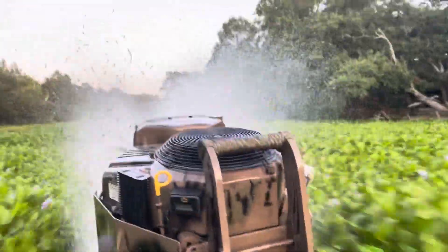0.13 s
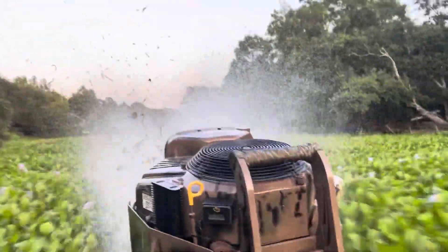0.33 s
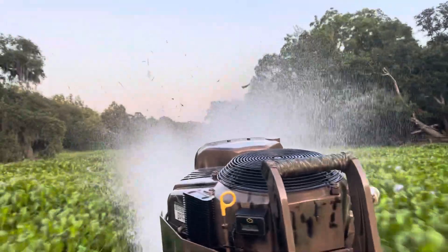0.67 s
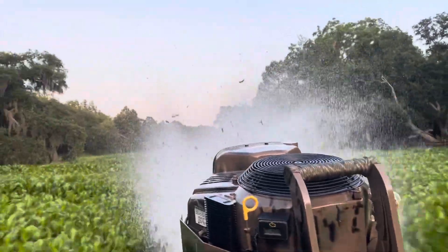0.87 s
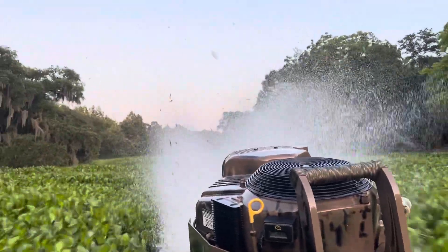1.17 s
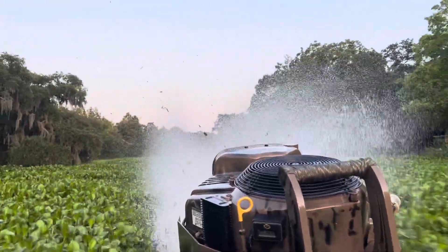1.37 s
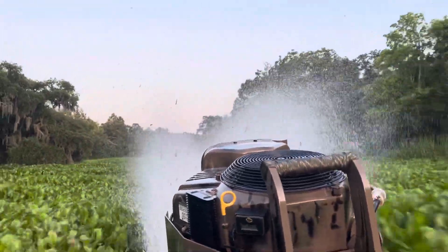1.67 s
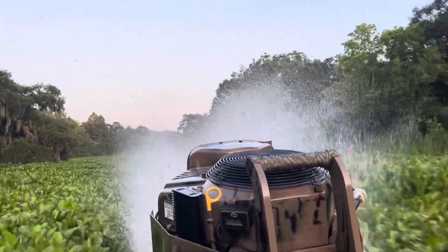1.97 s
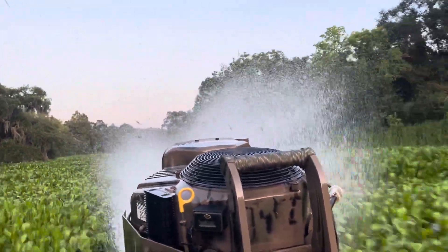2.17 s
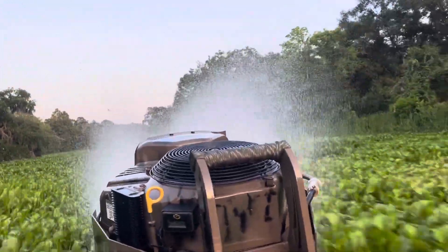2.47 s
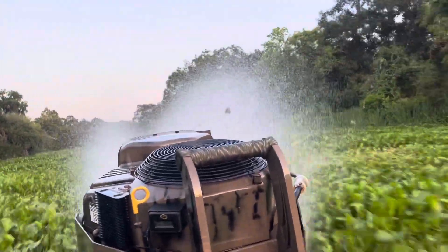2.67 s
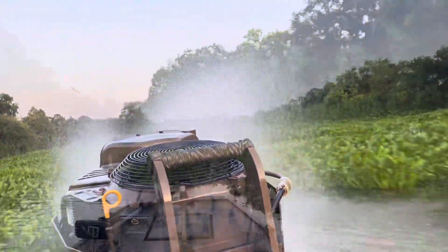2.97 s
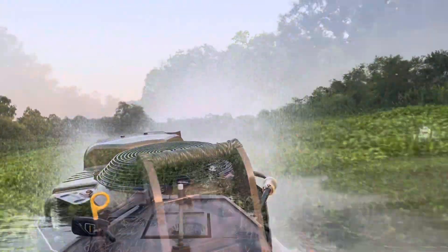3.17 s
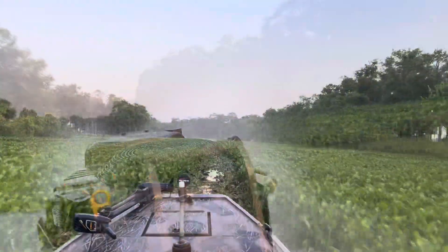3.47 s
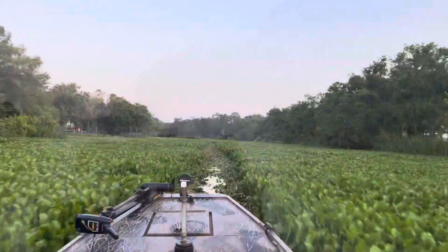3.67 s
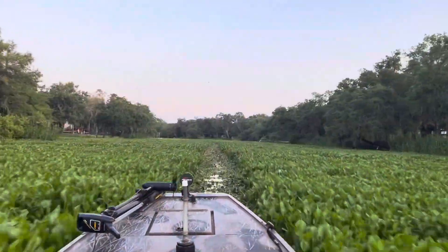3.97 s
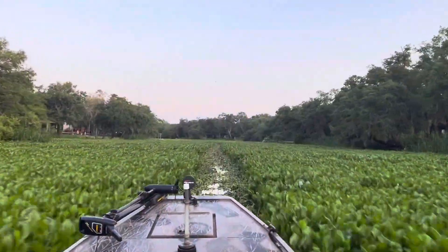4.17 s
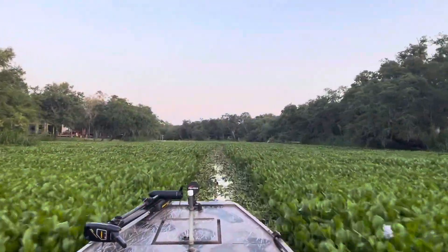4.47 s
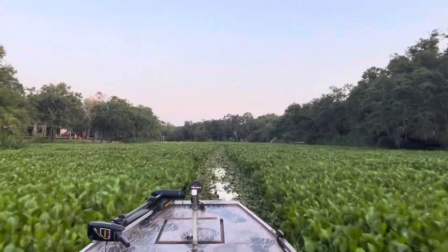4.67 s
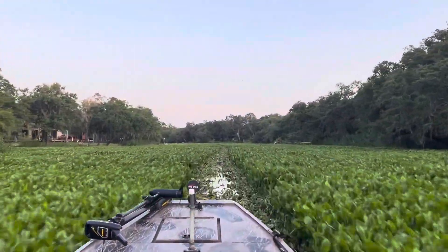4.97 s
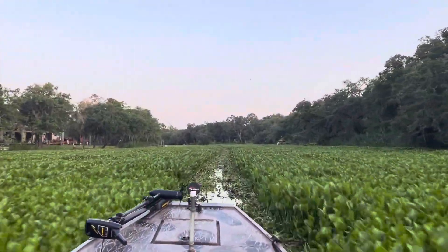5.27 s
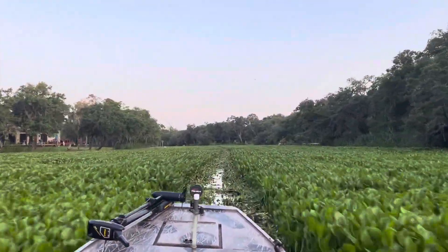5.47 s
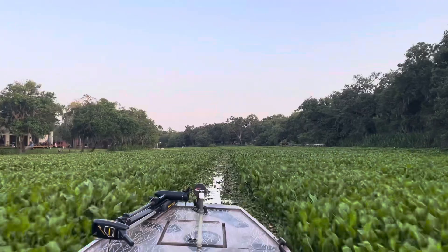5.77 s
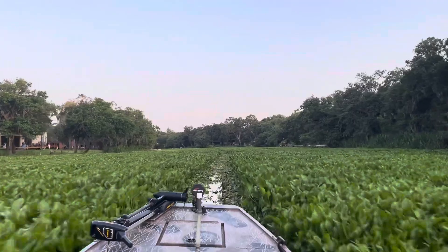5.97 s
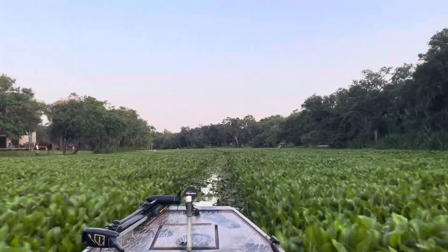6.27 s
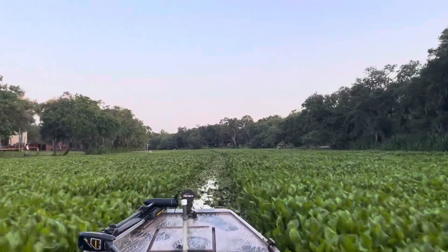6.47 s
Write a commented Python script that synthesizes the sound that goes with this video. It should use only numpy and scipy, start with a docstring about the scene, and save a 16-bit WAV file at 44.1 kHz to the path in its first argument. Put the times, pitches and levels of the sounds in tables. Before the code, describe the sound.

A boat motor roars at full throttle through floating plants, spray hissing, bogs down and sags, then fades into steadier, deeper droning with wind rumble.

```python
"""Outboard boat among floating plants

A twin-cylinder four-stroke outboard drives a flat boat through floating plants at full throttle.
Facing astern, firing bursts, knocks and spray shape noise, while crank and propeller orders sound as
tones that sink as the motor bogs down in the weeds. The sound then fades over to the same boat facing
ahead, running more steadily, with a heavier once-per-turn exhaust drone and more low wind noise."""
import sys
import numpy as np
from scipy import signal
from scipy.fft import rfft, irfft, next_fast_len
from scipy.io import wavfile
from scipy.ndimage import uniform_filter1d, minimum_filter1d, map_coordinates

SR = 44100
rng = np.random.default_rng(int(sys.argv[2]) if len(sys.argv) > 2 else 0)


def wav_record(signal):
    """Record a signal, one row per channel, as 16-bit PCM in the file named by sys.argv[1]."""
    frames = np.transpose(np.atleast_2d(signal))
    bounded = np.clip(frames, -1, 1)
    # unit amplitude maps onto the largest positive 16-bit level
    quanta = np.round(bounded * 32767).astype(np.int16)
    wavfile.write(sys.argv[1], SR, quanta)


N = 291942

CRUISE = 77  # crank turns a second at full throttle in open water

# spectrum of water churned by the propeller: freq_hz [Hz], density_db [dB per Hz]
CHURN_SPECTRUM = [(120, -41), (178, -15), (198, -9.5), (222, -11.5), (260, -21), (400, -77)]


def amp(db):
    """Decibels are a logarithmic measure of an amplitude ratio."""
    return 10 ** (np.asarray(db) / 20)


def unit(x):
    """Normalization: dividing by the root mean square sets the rms to 1."""
    return x / np.sqrt(np.mean(x ** 2) + 1e-20)


def along(points, hz):
    """Interpolation of (Hz, value) points on a logarithmic frequency axis."""
    f, v = np.transpose(points)
    return np.interp(np.log(hz + 1), np.log(f + 1), v)


def curves(rows):
    """Linear interpolation in time: one curve for each column after the time."""
    s, *cols = np.transpose(rows)
    return [np.interp(np.arange(N) / SR, s, c) for c in cols]


def ramp(span):
    """A linear transition from 0 to 1 between two times in seconds."""
    return np.interp(np.arange(N) / SR, span, [0, 1])


def swells(rows):
    """Raised-cosine envelopes, one for each (centre_s, length_s, height) row."""
    t = np.arange(N) / SR
    total = 0
    for centre, length, height in rows:
        phase = np.pi * np.clip((t - centre) / length, -.5, .5)
        total = total + height * np.cos(phase) ** 2
    return total


def wobble(rate):
    """Band-limited random fluctuation: a smooth curve through rate random knots a second."""
    knots = rng.standard_normal(2048)
    coarse = np.arange(0, N + 64, 64)
    smooth = map_coordinates(knots, [coarse * rate / SR], mode="wrap")
    return np.interp(np.arange(N), coarse, smooth)


def filtered(x, response):
    """Linear filtering: the spectrum of x times a complex response of frequency."""
    m = next_fast_len(N + SR // 4)
    return irfft(rfft(x, m) * response(np.fft.rfftfreq(m, 1 / SR)), m)[..., :N]


def coloured(x, spectrum):
    """Spectral shaping by a filter, normalized to rms 1."""
    return unit(filtered(x, lambda hz: amp(along(spectrum, hz))))


def noise():
    """Two unrelated white noises: the shared and the differing part of a sound field."""
    return rng.standard_normal((2, N))


def ports(field, alike, lead, direct):
    """Spatial coherence: two microphone ports hear a partly alike field and a direct sound, phase-shifted."""
    def mixing(hz):
        turn = np.arccos(np.clip(along(alike, hz), -1, 1)) / 2
        return np.array([np.cos(turn), np.sin(turn)])

    mid, side = filtered(field, mixing)
    pair = np.array([direct + mid + side, direct + mid - side])
    return filtered(pair, lambda hz: np.exp(.5j * np.outer([1, -1], along(lead, hz))))


def tone(turns, rough, rate):
    """Narrow-band modulation: a line of rms 1 whose strength and phase stray at random."""
    stray = 1 + rough * (wobble(rate) + 1j * wobble(rate))
    return unit(np.real(stray * np.exp(2j * np.pi * turns)))


def gains(levels_db, speed):
    """Load dependence: a faster crank raises roar and hiss and lowers the propeller levels."""
    # the propeller slips or digs in: centre_s [s], length_s [s], change_db [dB]
    bites = [(1.4, 0.15, -13), (1.66, 0.13, -21), (1.76, .1, 4), (2.23, 0.28, -2), (2.55, 0.2, 2.5),
             (4.86, 0.34, 8.5)]
    # the drone swells or dips: centre_s [s], length_s [s], change_db [dB]
    drone_swells = [(1.39, 0.28, -12), (1.68, 0.18, 3), (2.52, 0.2, -27), (2.92, 0.22, -14)]
    # clumps of weed pass under the hull, or thin out: centre_s [s], length_s [s], change_db [dB]
    hull_swells = [(1.05, 0.16, 10), (1.8, 0.19, -4), (2.8, 0.54, -2.5), (4.56, 0.35, 5.5)]
    extra = speed - CRUISE
    grip_db = -0.26 * extra + swells(bites)  # slopes are in dB for each turn a second
    return (amp(levels_db["roar"] + 0.39 * extra),
            amp(levels_db["hiss"] + .5 * extra),
            amp(levels_db["drone"] + swells(drone_swells)),
            amp(levels_db["bite"] + grip_db),
            amp(levels_db["churn"] + grip_db),
            amp(levels_db["rumble"] + swells(hull_swells)))


def firing(crank, sharp, weak, life):
    """Pulsed excitation: two unevenly spaced decaying bursts in each two-turn cycle; life in cycles."""
    first = (crank / 2) % 1
    second = (crank / 2 + .6) % 1
    bursts = np.exp(-first / life) + weak * np.exp(-second / (2 * life))
    return unit(1 + sharp * bursts)


def clatter(crank, scatter_db, count):
    """Impact excitation: valves and pistons knock near fixed crank angles with varying strength."""
    cycles = np.arange(int(crank[-1] / 2))[:, None]
    knocks = np.zeros((2, N))
    for row in knocks:
        play, strength = rng.standard_normal((2, 512, count))[:, :len(cycles)]
        angles = (np.arange(count) + rng.random(count)) / count + .006 * play  # in cycles
        at = np.interp(2 * (cycles + angles), crank, np.arange(N)).astype(int)
        signs = rng.choice([-1, 1], count)
        sizes = signs * amp(scatter_db * np.minimum(strength, 1.5))
        row += np.bincount(at.ravel(), sizes.ravel(), N)
    t = np.arange(SR // 100) / SR
    ring = rfft(rng.standard_normal(len(t)) * amp(-60 * t / 0.014))
    ring = irfft(ring / np.abs(ring))  # flat spectrum: the casing only smears each knock in time
    return unit(signal.fftconvolve(knocks, ring[None], axes=1)[:, :N])


def roar_astern(crank, knocks):
    """Amplitude-modulated noise: firing bursts and knocks, with combustion surging unevenly under load."""
    # roar facing astern: freq_hz [Hz], density_db [dB per Hz]
    spectrum = [(170, -27), (300, 2.5), (420, -3), (550, -3), (750, -6.5), (950, -6), (1300, -8.5),
                (1580, -13), (1780, -12), (1920, -12.5), (2200, -14.5), (2500, -15.5), (3300, -41)]
    bursts = noise() * firing(crank, sharp=0.42, weak=0.55, life=0.067)
    return coloured(bursts + amp(-6.0) * knocks, spectrum) * amp(wobble(34.5))


def casing(crank):
    """Modal resonance: uneven knocks set the engine casing ringing, a rasp that later weakens."""
    # modes of the casing: freq_hz [Hz], level_db [dB against the roar]
    modes = [(1780, -26.5), (2980, -24), (3550, -21), (4900, -27), (5600, -28)]
    t = np.arange(SR // 20) / SR
    rasp = np.zeros((2, N))
    for hz, db in modes:
        ring = np.sin(2 * np.pi * hz * t) * amp(-60 * t / .035)  # falls 60 dB in 35 ms
        knocks = clatter(crank, scatter_db=6, count=3)
        rasp += amp(db) * unit(signal.oaconvolve(knocks, ring[None], axes=1)[:, :N])
    return rasp * amp(-4.5 * ramp((1.4, 1.7)))


def housing(x, delay):
    """Comb filtering: a reflection off the engine housing, delay in seconds, adds to the upper mids."""
    # strength of the reflection: time_s [s], share [0-1]
    reflection = [(0, 0.57), (1.3, 1), (1.9, 0.045), (3.6, 0.15)]
    share = np.clip(curves(reflection)[0], 0, .9)
    band = [(700, -23), (1300, -9.0), (3900, -12.0), (5500, -28), (8000, -26)]  # (Hz, dB)
    return x + share * filtered(x, lambda hz: amp(along(band, hz)) * np.exp(-2j * np.pi * hz * delay))


def engine_tones(crank, column):
    """Order analysis: periodic combustion gives tones at whole and half multiples of the crank speed."""
    # crank tones: order [multiple of crank speed], astern_db, ahead_db [dB relative to each other]
    orders = [(.5, -38, -20), (1.5, -24, -12), (2.5, -12.5, -10.5), (3, -11.5, -8), (4, -47.5, -25),
              (4.5, -12, -17), (5, -16, -20), (7, -16, -37), (8, -19, -14), (12, -55, -12),
              (13.5, -20, -18.5), (14, -28, -17), (15.5, -20, -30), (16, -22, -16), (17.5, -19, -14),
              (18, -16, -21.5), (20, -15, -19.5)]
    return sum(amp(row[column]) * tone(row[0] * crank, rough=0.58, rate=9) for row in orders)


def frame_boom(speed):
    """Forced resonance: four shakes a turn, loud only near the resonance of the frame."""
    shake_hz = 4 * speed
    centre_hz, half_width_hz, level_db = 300.5, 5.5, -2.5  # level against the roar
    response = 1 / (1 + ((shake_hz - centre_hz) / half_width_hz) ** 2)
    return amp(level_db) * response * tone(np.cumsum(shake_hz) / SR, rough=0.27, rate=23)


def gear_whine(speed):
    """Gear meshing: twelve teeth a turn whine and grind, harder as the weeds drag the motor down."""
    # noise of the gear case: freq_hz [Hz], density_db [dB per Hz]
    grind_spectrum = [(600, -20), (800, -8), (950, -3), (1150, -8.5), (1450, -31)]
    mesh = 12 * np.cumsum(speed) / SR
    lost = CRUISE - speed  # turns a second
    differing = np.array([tone(mesh, rough=0.34, rate=68) for port in range(2)])
    whine = differing + tone(mesh, rough=0.38, rate=20)
    grind = coloured(noise(), grind_spectrum)
    whine_db = np.minimum(-20 + 1.2 * lost, -14)  # both levels are against the roar
    grind_db = np.minimum(-22.5 + 3 * lost, -3)
    return amp(whine_db) * whine + amp(grind_db) * grind


def propeller(crank, column):
    """Blade-passing tones: the geared-down blades beat unevenly as they chop plants and water."""
    # blade tones: harmonic [multiple of blade rate], astern_db, ahead_db [dB against the bite]
    harmonics = [(1, -17.5, -6), (2, -26.5, -3.5), (3, -63, -12.5)]
    passes = 1.312 * crank  # blade passes per crank turn
    return sum(amp(row[column]) * tone(row[0] * passes, rough=0.25, rate=30) for row in harmonics)


def hollow():
    """Frequency modulation: water around the propeller drones waveringly, and weakens in the mat."""
    # wavering pitch of the churned water: time_s [s], pitch_hz [Hz]
    pitch = [(0, 199.7), (.12, 204.8), (.24, 193.4), (.38, 211), (.58, 197), (.7, 204.5), (.85, 196),
             (1.25, 197.4), (1.48, 209.4), (1.62, 197.1), (1.72, 207.3), (1.95, 194.4), (2.45, 201),
             (2.75, 188)]
    hz, = curves(pitch)
    level_db = -2 - 9 * ramp((1.2, 1.97))  # against the bite
    return amp(level_db) * tone(np.cumsum(hz) / SR, rough=.24, rate=30)


def rumble(spectrum):
    """Turbulence noise: a lumpy low rumble of air, or of water under the hull."""
    return unit(coloured(noise(), spectrum) * amp(0.45 * wobble(24)))


def droplets(hz, spread, cycles, size_db, count):
    """Superposed impacts: each drop or shred rings for a few cycles at its own pitch."""
    when = rng.random(count)
    pitch = rng.standard_normal(count)
    size = rng.exponential(size=count)
    t = np.arange(160)  # samples
    pitch_hz = np.clip(hz * np.exp(spread * pitch), 1500, SR / 3)
    turns = pitch_hz[:, None] * t / SR
    heights = amp(size_db * np.minimum(size, 4))[:, None]
    drops = heights * np.sin(2 * np.pi * turns) * np.exp(-turns / cycles)
    at = (when * N).astype(int)[:, None] + t
    return unit(np.bincount(at.ravel(), drops.ravel(), N)[:N])


def patchy(x, depth_db, size):
    """Time-frequency modulation: a random gain in small patches of time and pitch makes the hiss uneven."""
    z = signal.stft(x, nperseg=512)[2]
    patches = rng.standard_normal(z.shape[1:])
    patches = uniform_filter1d(uniform_filter1d(patches, size, 0), size, 1)
    gain = amp(depth_db * unit(patches))
    return unit(signal.istft(z * gain, nperseg=512)[1][:, :N])


def spray_hiss(crank, knocks):
    """Superposition: pulsed noise and falling drops form spray; shreds of weed tick dryly on the boat."""
    # hiss facing astern: freq_hz [Hz], density_db [dB per Hz]
    spectrum = [(1900, -40), (2600, -4.5), (3000, -0.5), (3500, -2.5), (3950, -6), (4900, -3), (5250, -6.5),
                (5600, -4.5), (6800, -7), (8500, -4.5), (10200, 1), (11200, -2), (12000, -14.5),
                (12700, -17), (14000, -43)]
    drops = np.array([droplets(hz=5980, spread=0.483, cycles=6, size_db=2.6, count=7000)
                      for port in range(2)])
    spray = noise() * firing(crank, sharp=1.4, weak=0.26, life=0.3) + amp(-11.5) * drops
    flecks = droplets(hz=7580, spread=.3, cycles=3, size_db=1.5, count=70)
    uneven = patchy(spray + amp(-3) * knocks, depth_db=2.4, size=3)
    return coloured(uneven + amp(-23) * flecks, spectrum) * amp(0.27 * wobble(14))


def ticks():
    """Impulse decay: each larger shred of weed hits the boat with one dry crack of noise."""
    # hits: start_s [s], level_db [dB]
    hits = [(.1166, -16.5), (.2972, -19), (.3227, -26), (0.6633, -29), (1.7769, -28), (3.07, -22)]
    # their noise: freq_hz [Hz], density_db [dB per Hz]
    spectrum = [(1500, -30), (4800, 0), (7000, 0), (11500, 2), (13000, -13)]
    t = np.arange(N) / SR
    t60_s = 0.018
    strikes = sum((t >= s) * amp(db - 60 * np.abs(t - s) / t60_s) for s, db in hits)
    return strikes * coloured(rng.standard_normal(N), spectrum)


def gusts():
    """Turbulent pressure: short, deep thumps of wind, different at each port."""
    # thumps: centre_s [s], length_s [s], level_db [dB]
    thumps = [(0.323, .24, -34), (1.05, .24, -31), (1.831, .4, -23), (2.146, .36, -26)]
    # their noise: freq_hz [Hz], density_db [dB per Hz]
    spectrum = [(20, -25), (38, -2), (54, 5), (75, -18), (140, -60)]
    envelope = swells([(s, length, amp(db)) for s, length, db in thumps])
    return envelope * coloured(noise(), spectrum)


def astern():
    """Superposition facing the motor: clatter, straining gears, a churning propeller and flying spray."""
    # crankshaft, bogging in the weeds: time_s [s], speed [turns a second]
    crank_speed = [(0, 77.45), (.3, 77.37), (.6, 75.75), (1.25, 75.2), (1.8, 75.7), (2.4, 72.55),
                   (2.6, 70.93), (2.85, 67.7), (3.3, 66)]
    # levels at cruising speed by source: level_db [dB]
    levels_db = dict(roar=-20.5, hiss=-26, drone=-28.5, bite=-19.5, churn=-22.5, rumble=-30.5)
    # weed and water under the stern: freq_hz [Hz], density_db [dB per Hz]
    hull_spectrum = [(20, -50), (40, -6), (62, -3.5), (110, 1.5), (160, -4.5), (240, -5.5), (320, -7.5),
                     (500, -64), (900, -78)]
    # likeness of the two ports: freq_hz [Hz], likeness [0-1]
    alike = [(60, 0.55), (200, 0.61), (500, 0.73), (1200, 0.56), (1700, 0.25), (2400, 0.92), (2750, 0.48),
             (3100, .7), (3900, 0.32), (6200, 0.65), (7100, .35), (8400, 0.99), (11000, 0.97)]
    # phase by which the left port leads: freq_hz [Hz], lead_rad [radians]
    lead = [(100, 0.33), (600, 0.74), (1050, 0), (1350, 1.13), (1500, 2.5), (1900, -2), (2300, 0.3),
            (2600, 1.8), (2800, 1.2), (3150, 0.76), (3450, 0.95), (3900, -0.5), (4400, .5), (6700, 0.2),
            (7500, 0.7), (8750, -0.5), (10250, -3), (11800, -5.5)]
    speed, = curves(crank_speed)
    crank = np.cumsum(speed) / SR  # turns
    roar_gain, hiss_gain, drone_gain, bite_gain, churn_gain, rumble_gain = gains(levels_db, speed)
    in_mat = ramp((1.226, 1.4))  # in the thick mat the exhaust deepens and the hull rumbles
    falter = ramp((2.75, 2.9))  # the motor falters
    power, thrust = amp(-1.5 * falter), amp(-7 * falter)

    knocks = clatter(crank, scatter_db=1.5, count=9)
    engine = roar_gain * (roar_astern(crank, knocks) + casing(crank))
    field = power * housing(engine + hiss_gain * spray_hiss(crank, knocks), delay=0.0017)
    field = field + rumble_gain * amp(10 * in_mat) * rumble(hull_spectrum)
    churn = churn_gain * coloured(noise(), CHURN_SPECTRUM)
    field = field + thrust * (churn + roar_gain * gear_whine(speed))

    drone = drone_gain * amp(8 * in_mat) * tone(crank, rough=0.21, rate=31)
    tones = roar_gain * (amp(-3.5) * engine_tones(crank, 1) + frame_boom(speed))
    blades = bite_gain * (propeller(crank, 1) + hollow())
    direct = thrust * (drone + blades) + power * tones + ticks()
    return ports(field, alike, lead, direct) * amp([[-.75], [.75]]) + gusts()


def roar_ahead(crank):
    """Amplitude-modulated noise: shallower firing bursts and widely scattered knocks, duller in colour."""
    # roar facing ahead: freq_hz [Hz], density_db [dB per Hz]
    spectrum = [(170, -9), (300, -3), (480, -10), (620, -9.5), (720, -10.5), (950, -8.5), (1250, -12),
                (1600, -15.5), (2000, -19), (2500, -24), (3600, -66)]
    knocks = clatter(crank, scatter_db=8.5, count=12)
    bursts = noise() * firing(crank, sharp=0.09, weak=0.55, life=.13)
    return coloured(bursts + amp(-7.5) * knocks, spectrum)


def leaf_swish(crank):
    """Friction and impact noise: wet leaves swish along the hull, with drops pattering."""
    # hiss facing ahead: freq_hz [Hz], density_db [dB per Hz]
    spectrum = [(1900, -49), (2600, -4), (3300, -1), (4200, -0.5), (5700, 0.5), (6800, -1), (7600, -5.5),
                (8600, -5), (10200, -1.5), (11200, -7), (12200, -20), (14000, -45)]
    drops = np.array([droplets(hz=5635, spread=0.456, cycles=9.8, size_db=1.0, count=9000)
                      for port in range(2)])
    swish = noise() * firing(crank, sharp=0.38, weak=0.25, life=.35) + amp(-13.5) * drops
    return coloured(patchy(swish, depth_db=1.8, size=3), spectrum)


def cowling():
    """Fixed resonance: the cowling sings at one pitch whatever the speed."""
    # its narrow band: freq_hz [Hz], density_db [dB per Hz]
    spectrum = [(900, -39), (1035, -17), (1068, 5), (1086, -2), (1110, -15), (1250, -43)]
    return amp(-14) * coloured(noise(), spectrum)


def ahead():
    """Superposition facing the bow: throbbing exhaust, a duller engine, wind and swishing leaves."""
    # crankshaft, running free: time_s [s], speed [turns a second]
    crank_speed = [(3.05, 75.2), (4.07, 75.5), (4.35, 77.3), (4.58, 79.3), (4.95, 77.1), (5.5, 77.1),
                   (5.9, 76.7), (6.3, 76.3), (6.62, 76.8)]
    # levels at cruising speed by source: level_db [dB]
    levels_db = dict(roar=-18.5, hiss=-30, drone=-14, bite=-21, churn=-31.5, rumble=-18)
    # rumble of air and hull: freq_hz [Hz], density_db [dB per Hz]
    wind_spectrum = [(18, -50), (30, -16), (42, -8.5), (60, 0), (110, 1.5), (160, -1), (240, -2),
                     (320, -12.5), (500, -60), (900, -78)]
    # likeness of the two ports: freq_hz [Hz], likeness [0-1]
    alike = [(80, 0.88), (250, 0.82), (520, 0.45), (900, 0.52), (1400, 0.96), (2000, 0.21), (4000, 0.36),
             (7400, 0.23), (8600, 0.84), (10200, 0.98)]
    # phase by which the left port leads: freq_hz [Hz], lead_rad [radians]
    lead = [(200, 0), (500, 0.5), (880, 1.2), (1500, 0.68), (2000, 0.5), (2400, 3), (3150, 3.5),
            (3450, -.4), (4800, -0.6), (5400, 0.5), (6300, 0.3), (7250, 2), (7700, -1.5), (8750, -1),
            (10250, -3), (11800, -6)]
    speed, = curves(crank_speed)
    crank = np.cumsum(speed) / SR  # turns
    roar_gain, hiss_gain, drone_gain, bite_gain, churn_gain, rumble_gain = gains(levels_db, speed)

    field = roar_gain * roar_ahead(crank) + hiss_gain * leaf_swish(crank)
    field = field * amp(0.4 * wobble(12))
    field = field + rumble_gain * rumble(wind_spectrum)
    field = field + churn_gain * coloured(noise(), CHURN_SPECTRUM)
    field = field + roar_gain * cowling()

    drone = drone_gain * tone(crank, rough=.06, rate=18)  # a nearly steady exhaust note
    blades = bite_gain * propeller(crank, 2)
    direct = drone + blades + roar_gain * amp(-3.5) * engine_tones(crank, 2)
    return ports(field, alike, lead, direct) * amp([[-1.45], [1.45]])


def limited(x):
    """Peak limiting: a smoothed gain, shared by both ports, turns down peaks above 0.9."""
    needed = np.minimum(1, .9 / (np.abs(x).max(0) + 1e-9))
    return x * uniform_filter1d(minimum_filter1d(needed, size=400), size=300)


def scene():
    """Linear cross-fade: with unrelated sounds the level sags between the two directions."""
    facing = ramp((2.7, 3.8))
    return (1 - facing) * astern() + facing * ahead()


def record(dry):
    """Band limiting: the ports differ in treble, peaks are limited, lows roll off and the top is cut."""
    # half the level difference, left over right: (Hz, dB)
    lean_db = [(80, 0.31), (1000, 0.013), (2600, -0.43), (4500, 1.8), (7000, 1.9), (9500, 0.95)]
    low_hz, top_hz = 26, 12650
    heard = filtered(dry, lambda hz: amp(np.outer([1, -1], along(lean_db, hz))))
    return filtered(limited(heard), lambda hz: (hz < top_hz) * hz ** 4 / (hz ** 4 + low_hz ** 4))


dry = scene()
out = record(dry)
wav_record(out)
```